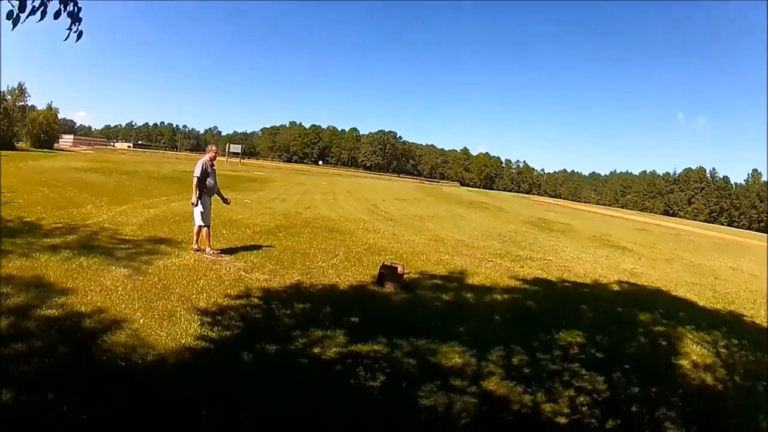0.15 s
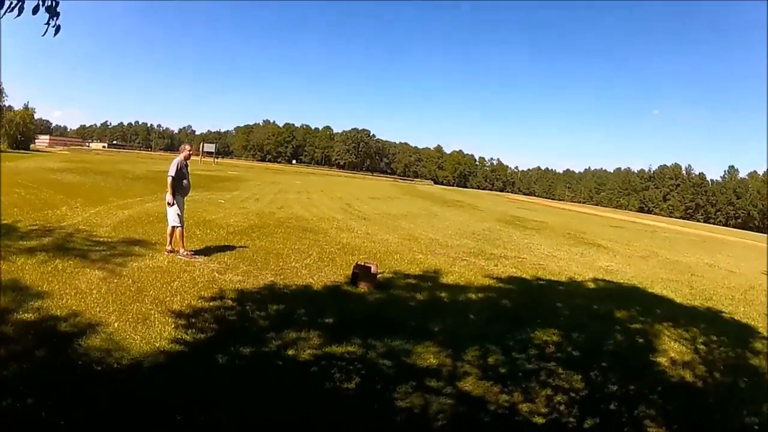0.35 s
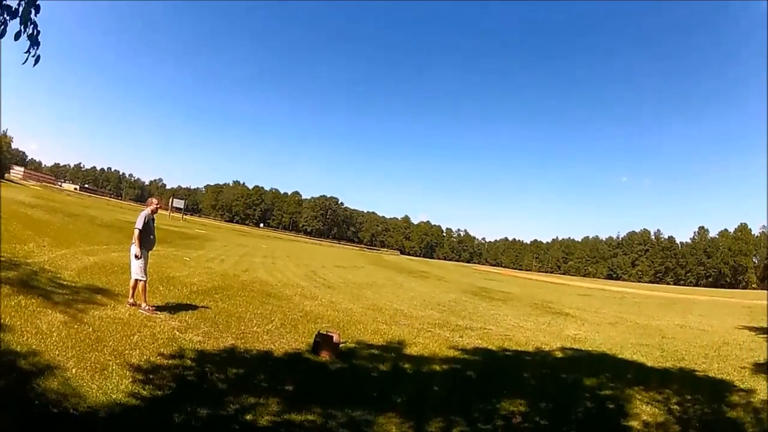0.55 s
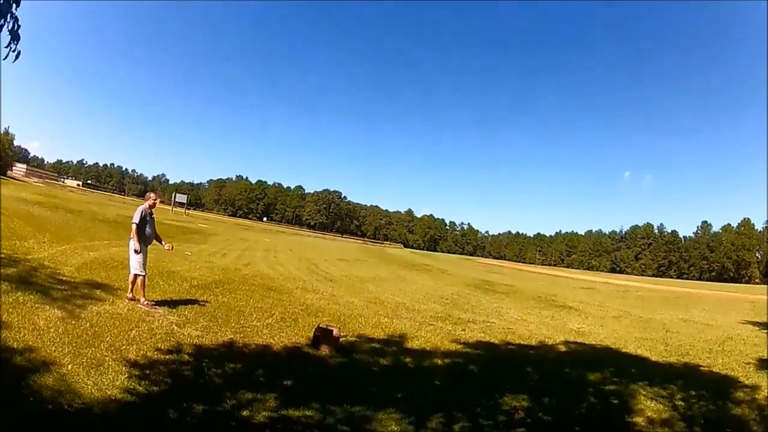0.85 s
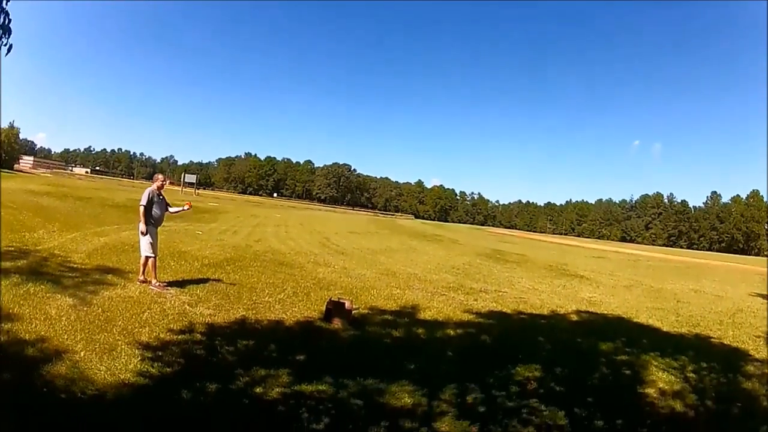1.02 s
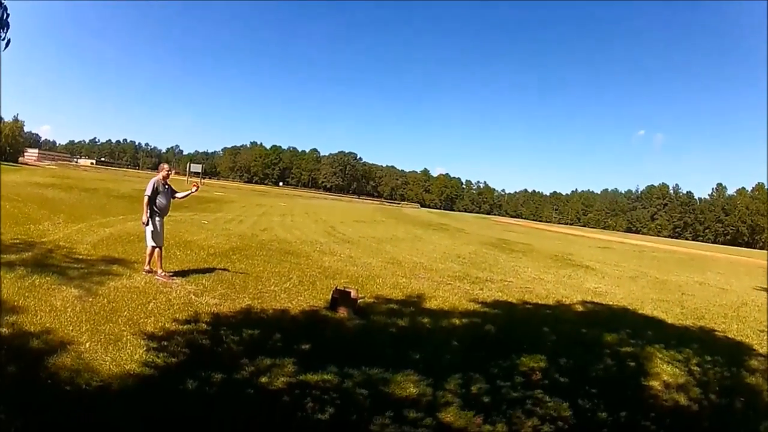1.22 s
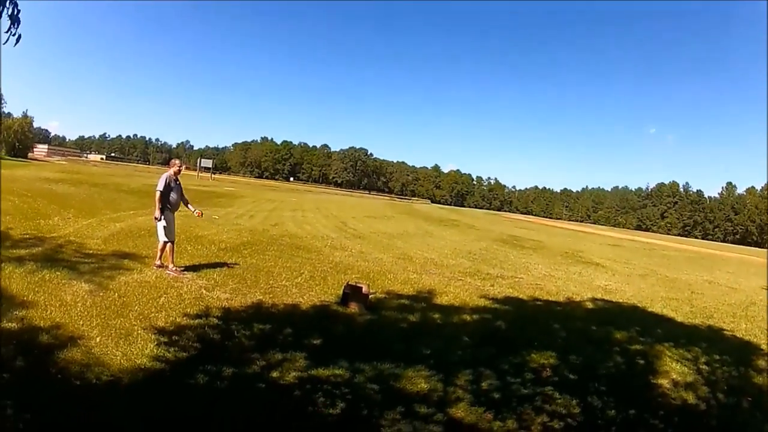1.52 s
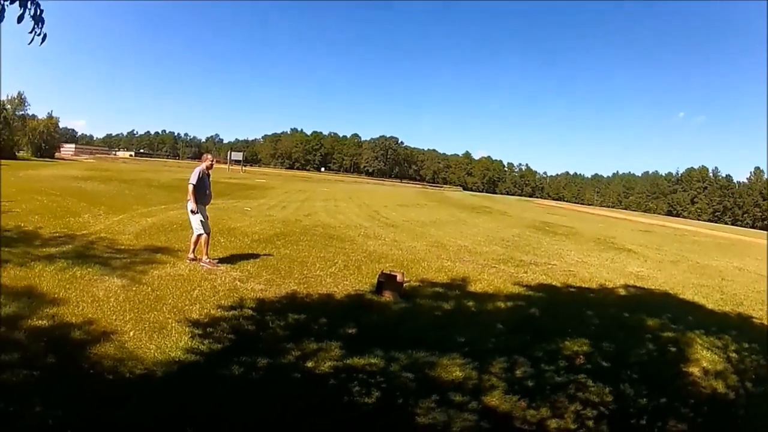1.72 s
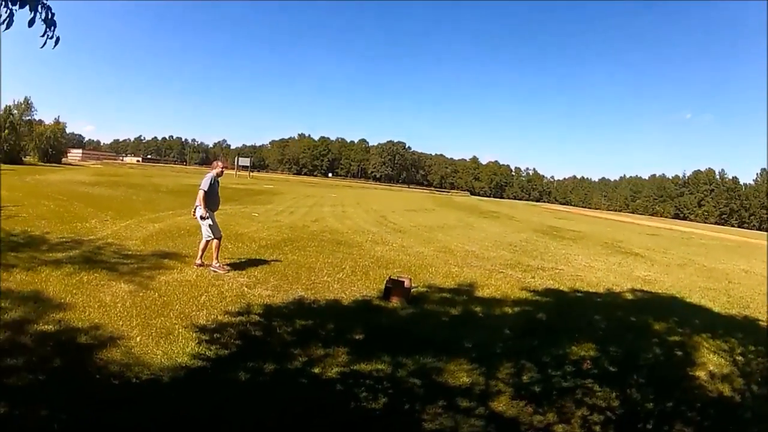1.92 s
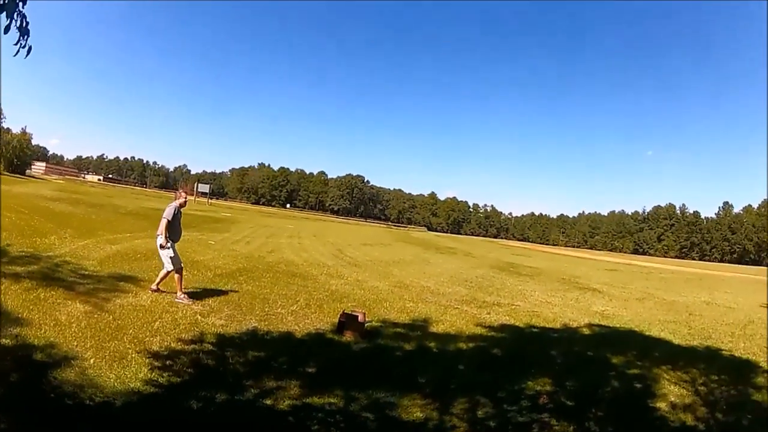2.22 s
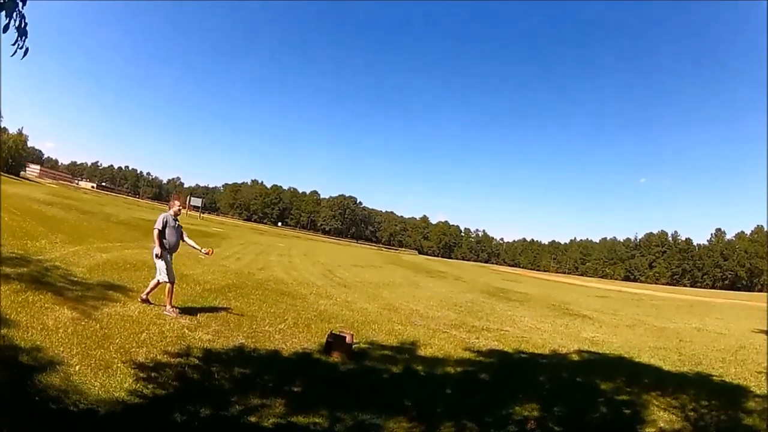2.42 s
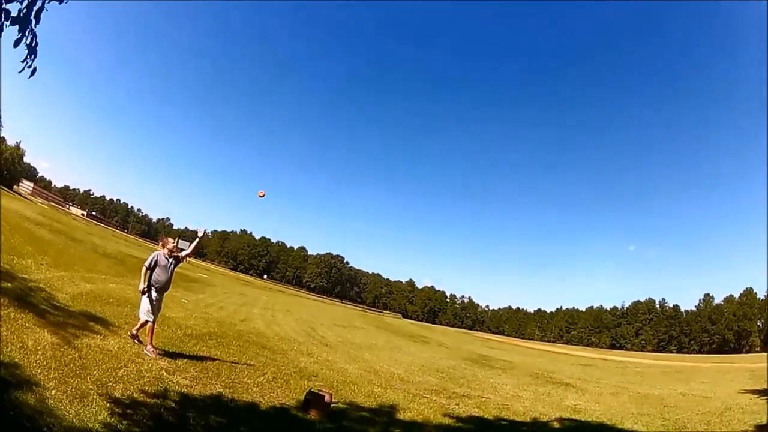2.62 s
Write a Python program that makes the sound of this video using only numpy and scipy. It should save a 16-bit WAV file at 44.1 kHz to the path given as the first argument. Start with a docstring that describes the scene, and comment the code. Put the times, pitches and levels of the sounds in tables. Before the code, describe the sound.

Wind rumbling and buffeting on a microphone in an open field, with two tiny dry snaps

```python
"""An open field on a breezy day: noise beds make a far hum, airy hiss and a rush that comes and goes,
under a faint throbbing band of insects. Wind rumbles on the microphone as shaped noise, with soft bumps.
Early on comes one faint short peep, a falling sine, then two small dry snaps, clicks into short modes.
Past the middle the wind swells in one gust, its crest thickened by a low whoosh.
A thin high sizzle follows the wind throughout: the recorder's mirror of the low sound."""
import sys
import numpy as np
from scipy import signal
from scipy.fft import rfft, irfft
from scipy.io import wavfile
from scipy.ndimage import uniform_filter1d

SR = 44100
rng = np.random.default_rng(int(sys.argv[2]) if len(sys.argv) > 2 else 0)


def store_pcm(level_fs):
    """Save levels as 16-bit WAV."""
    pcm = np.round(np.clip(level_fs, -1, 1) * 32767).astype(np.int16)
    wavfile.write(sys.argv[1], SR, np.atleast_2d(pcm).T)


N = 121275
TIME = np.arange(N) / SR

# All spectra of noise beds give relative density; the bed's level is set apart.
# far hum: (frequency [Hz], density [dB per Hz])
HUM_SPECTRUM = [(60, -16), (150, -2), (290, 2.5), (420, -4), (540, -2.5), (660, 0.65), (780, -6.5),
                (950, -14), (1300, -22.5), (2500, -46.5)]
HUM_DB = -55

# airy hiss: (frequency [Hz], density [dB per Hz])
AIR_SPECTRUM = [(900, 0), (1500, -3), (2050, 0), (2600, -1.5), (3300, -5.5), (5100, -10), (6050, -22),
                (7000, -12), (9000, -13), (9950, -12), (10600, -14.5), (12500, -29), (13400, -42),
                (14100, -12), (15200, -16)]
# ride of the hiss before its trim: (time [s], level [dB])
AIR_RIDE = [(0, -69.5), (.45, -69.5), (.9, -70), (1.28, -70), (1.55, -71), (1.9, -70), (2.75, -70.5)]
AIR_TRIM_DB = 0.77

# soft midrange rush: (frequency [Hz], density [dB per Hz])
RUSH_SPECTRUM = [(900, -19), (1300, -7), (2100, 3), (2800, -13), (4000, -12)]
# coming and going of the rush: (time [s], level [dB])
RUSH_RIDE = [(0, -76), (.25, -77.5), (.38, -74), (.55, -78), (.88, -76), (1.1, -79), (1.25, -76),
             (1.5, -90), (1.92, -83), (2.02, -72.5), (2.09, -75.5), (2.17, -72), (2.35, -76), (2.75, -77)]

# the insect band reaches INSECT_REACH_HZ to each side; its level is set before the throb
INSECT_HZ, INSECT_REACH_HZ, INSECT_PULSE_HZ, INSECT_DB = 9600, 250, 41.8, -94

# the peep's time and pitch are those of its middle
PEEP_S, PEEP_LENGTH_S, PEEP_HZ, PEEP_FALL_HZ_PER_S, PEEP_PEAK_DB = 0.455, 0.05, 2105, 900, -65.3

# dry snaps, driving level: (time [s], level [dB], brightness [dB per octave])
SNAPS = [(0.5824, -57.5, -3), (0.9149, -52, 0)]
# contacts within each snap: (time after its start [s], level against the snap [dB])
SNAP_CONTACTS = [(0, 0), (.002, -15), (.008, -20)]
# ringing modes of the snaps: (frequency [Hz], level [dB], 60 dB decay [s], delay [s])
SNAP_MODES = [(3400, 4, 0.003, 0), (3970, 5.5, 0.004, 0), (4950, 1, 0.0055, .0007),
              (7000, -4, 0.0055, .0007), (8100, 1.5, 0.003, 0)]
SNAP_BAND_HZ = (2600, 10000)

# single eddies that thump the microphone: (time [s], peak level [dB], half width [s])
BUFFETS = [(0.451, -27, 0.0043), (0.697, -29, 0.0036), (1.503, -23, 0.0027), (1.639, -21, 0.0018),
           (1.821, -34, 0.0023), (2.285, -30.5, 0.0019), (2.492, -30.5, 0.0028)]

# strength of the wind on the microphone, before the trim: (time [s], level [dB])
WIND_RIDE = [(0, -42), (.27, -49), (.38, -43), (.62, -42.5), (.79, -38.5), (.91, -40.5), (.945, -46.5),
             (1.04, -41), (1.11, -35.5), (1.22, -40), (1.31, -37.5), (1.39, -40), (1.425, -32),
             (1.56, -38.5), (1.64, -35.5), (1.84, -33.5), (2.0, -38), (2.15, -38), (2.33, -38),
             (2.375, -41), (2.45, -38.5), (2.6, -36.5), (2.75, -42.5)]
# rumble of the wind: (frequency [Hz], density [dB per Hz])
RUMBLE_SPECTRUM = [(15, -43.5), (26, -8.5), (38, -0.5), (58, -3), (80, 2.5), (120, -0.5), (175, -3),
                   (230, -6.5), (295, -12.5), (350, -21), (500, -27.5), (700, -39), (1100, -60)]
# FLUTTER_DB is the typical spread of the flutter
WIND_TRIM_DB, FLUTTER_DB, FLUTTER_HZ = -0.5, 1.34, 23.5
DEEP_BELOW_HZ, BRIGHT_ABOVE_HZ = 77, 210
DEEP_FOLLOWS, BRIGHT_FOLLOWS = 0.25, 1.1  # share of the wind's swing in dB

# low whoosh at the crest of the gust: (frequency [Hz], density [dB per Hz])
WHOOSH_SPECTRUM = [(200, 1), (330, 0), (480, -4.5), (600, -11), (900, -27.5)]
WHOOSH_S, WHOOSH_WIDTH_S, WHOOSH_DB = 1.652, 0.069, -45.5

# sizzle against the low sound it mirrors: (distance from the centre [Hz], level [dB])
SIZZLE_MIRROR = [(20, -36), (40, -56), (80, -42), (150, -38), (250, -33), (400, -30), (650, -22.5),
                 (900, -28.5), (1300, -25)]
SIZZLE_HZ, CUTOFF_HZ = 12000, 15250


def from_db(db):
    """Turn decibels into gain."""
    return 10 ** (np.asarray(db) / 20)


def rms_one(x):
    """Scale a sound to unit rms."""
    return x / np.sqrt(np.mean(x ** 2) + 1e-20)


def in_time(points):
    """Draw a control curve through (time, value) points."""
    return np.interp(TIME, *np.transpose(points))


def colour(x, points):
    """Filter by (frequency, dB) points on a log frequency axis, all but silent outside them."""
    hz, db = np.transpose(points)
    bins = np.maximum(np.arange(N // 2 + 1) * SR / N, 1)
    gain_db = np.interp(np.log(bins), np.log(hz), db, left=-120, right=-120)
    return irfft(rfft(x) * from_db(gain_db), N)


def noise(points):
    """Coloured noise of unit rms."""
    return rms_one(colour(rng.standard_normal(N), points))


def drift(rate_hz):
    """Random wander of unit rms: noise through two equal one-pole lowpasses."""
    pole = np.exp(-2 * np.pi * rate_hz / SR)
    # the first second is dropped while the filter settles
    wander = signal.lfilter([1], [1, -2 * pole, pole * pole], rng.standard_normal(N + SR))[SR:]
    return rms_one(wander)


def below(x, hz):
    """Keep the part of a sound under a frequency, without shifting it in time."""
    return signal.sosfiltfilt(signal.butter(2, hz, fs=SR, output="sos"), x)


def steady(x, size):
    """Even out a noise's swings over a span of samples, at about its overall level."""
    return x * np.std(x) / np.sqrt(uniform_filter1d(x ** 2, size=size) + 1e-20)


def ring(clicks, hz, t60):
    """A resonator: each unit click starts a decaying sine of initial height 1."""
    radius = from_db(-60 / (t60 * SR))
    angle = 2 * np.pi * hz / SR
    feedback = [1, -2 * radius * np.cos(angle), radius * radius]
    return signal.lfilter([0, np.sin(angle)], feedback, clicks + 1e-18)


def far_hum():
    """Steady noise weighted to the lows and low mids."""
    return from_db(HUM_DB) * noise(HUM_SPECTRUM)


def airy_hiss():
    """High noise on a nearly level ride."""
    return from_db(AIR_TRIM_DB + in_time(AIR_RIDE)) * noise(AIR_SPECTRUM)


def midrange_rush():
    """A soft band of noise that comes and goes."""
    return from_db(in_time(RUSH_RIDE)) * noise(RUSH_SPECTRUM)


def insects():
    """A faint chorus: slow noise on a high carrier, throbbing with a wandering phase."""
    throb = 1 + np.sin(2 * np.pi * INSECT_PULSE_HZ * TIME + drift(2.8)) / 2
    carrier = np.sin(2 * np.pi * INSECT_HZ * TIME)
    band = rms_one(below(rng.standard_normal(N), INSECT_REACH_HZ) * carrier)
    return from_db(INSECT_DB) * throb * band


def peep():
    """A sine that falls slightly in pitch under a rounded swell."""
    t = TIME - PEEP_S
    swell = np.cos(np.pi * np.clip(t / PEEP_LENGTH_S, -.5, .5))
    # half the fall in the phase gives the full fall in pitch
    cycles = (PEEP_HZ - PEEP_FALL_HZ_PER_S * t / 2) * t
    return from_db(PEEP_PEAK_DB) * swell * np.sin(2 * np.pi * cycles)


def snaps():
    """A two-stage crack into a few short modes, then faint rebounds; the softer snap is duller."""
    contacts = [(start + lag, db + loss, tilt)
                for start, db, tilt in SNAPS for lag, loss in SNAP_CONTACTS]
    times, levels_db, tilts = np.transpose(contacts)
    out = np.zeros(N)
    for k, (hz, mode_db, t60, delay) in enumerate(SNAP_MODES):
        octaves = np.log2(hz / SNAP_MODES[0][0])
        chance_db = rng.standard_normal(len(times))
        clicks = np.zeros(N)
        places = ((times + delay) * SR).astype(int)  # delayed modes make the second stage
        clicks[places] = from_db(levels_db + mode_db + tilts * octaves + chance_db)
        out += (-1) ** k * ring(clicks, hz, t60)  # neighbouring modes take opposite signs
    return signal.sosfilt(signal.butter(2, SNAP_BAND_HZ, "band", fs=SR, output="sos"), out)


def buffets():
    """Each eddy is one soft pressure bump with suction on both sides."""
    out = np.zeros(N)
    for time, peak_db, half_width in BUFFETS:
        u = ((TIME - time) / half_width) ** 2
        out += from_db(peak_db) * (1 - u) * np.exp(-u / 2)
    return out


def gust_whoosh():
    """A short low whoosh of evened noise swells and fades with the gust's crest."""
    swell = np.exp(-((TIME - WHOOSH_S) / WHOOSH_WIDTH_S) ** 2 / 2)
    return from_db(WHOOSH_DB) * swell * steady(noise(WHOOSH_SPECTRUM), size=1400)


def wind_rumble():
    """Turbulence on the microphone: a stronger wind is louder and brighter."""
    level_db = in_time(WIND_RIDE)
    mean_db = level_db.mean()
    swing_db = level_db - mean_db
    eddies = noise(RUMBLE_SPECTRUM)
    deep = below(eddies, DEEP_BELOW_HZ)
    deep_and_body = below(eddies, BRIGHT_ABOVE_HZ)
    body = deep_and_body - deep
    bright = eddies - deep_and_body
    # the higher the band, the more it follows the wind
    rumble = steady(deep, size=3000) * from_db(DEEP_FOLLOWS * swing_db)
    rumble += steady(body, size=1800) * from_db(swing_db)
    rumble += steady(bright, size=1400) * from_db(BRIGHT_FOLLOWS * swing_db)
    flutter_db = FLUTTER_DB * drift(FLUTTER_HZ)
    return rumble * from_db(WIND_TRIM_DB + mean_db + flutter_db)


def scene():
    """Mix everything that reaches the microphone into one channel."""
    background = far_hum() + airy_hiss() + midrange_rush() + insects()
    events = peep() + snaps()
    wind = buffets() + gust_whoosh() + wind_rumble()
    return (background + events + wind)[None]


def record(dry):
    """The recorder mirrors the low sound faintly around one high frequency, as a sizzle; the top is cut."""
    carrier = 2 * np.cos(2 * np.pi * SIZZLE_HZ * TIME)
    sizzle = colour(dry[0], SIZZLE_MIRROR) * carrier
    top_cut = signal.ellip(12, .2, 70, CUTOFF_HZ, fs=SR, output="sos")
    return signal.sosfilt(top_cut, dry + sizzle)


dry = scene()
out = record(dry)
store_pcm(out)
```